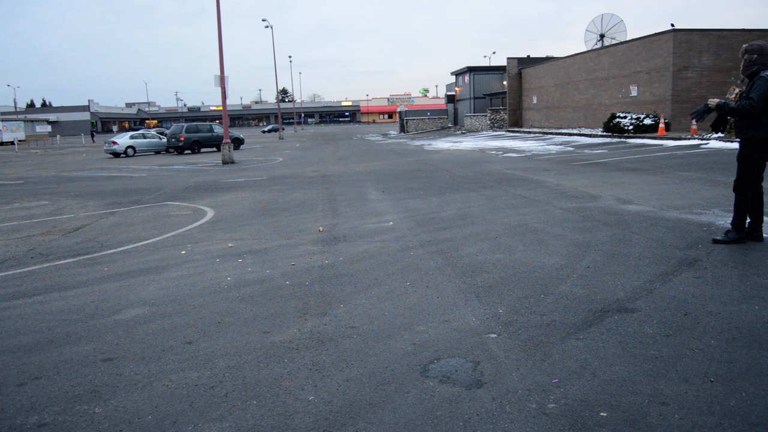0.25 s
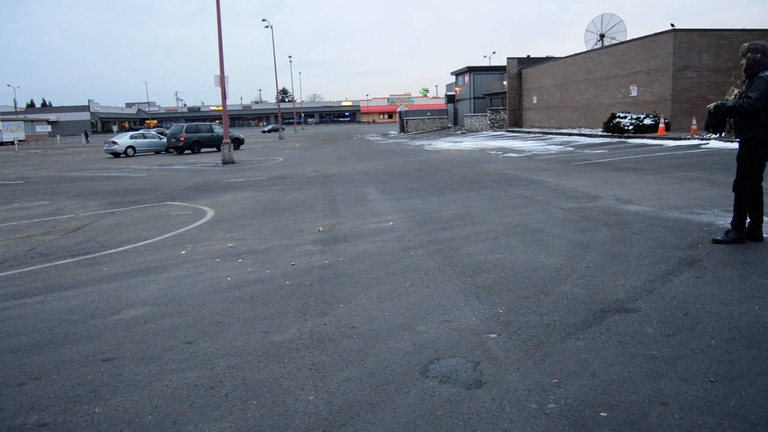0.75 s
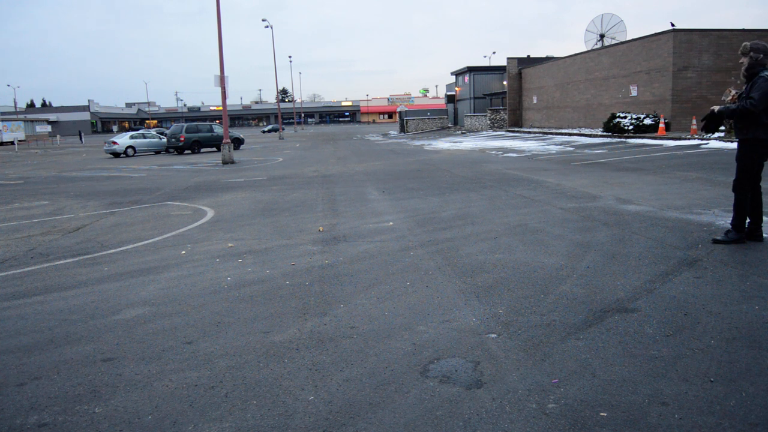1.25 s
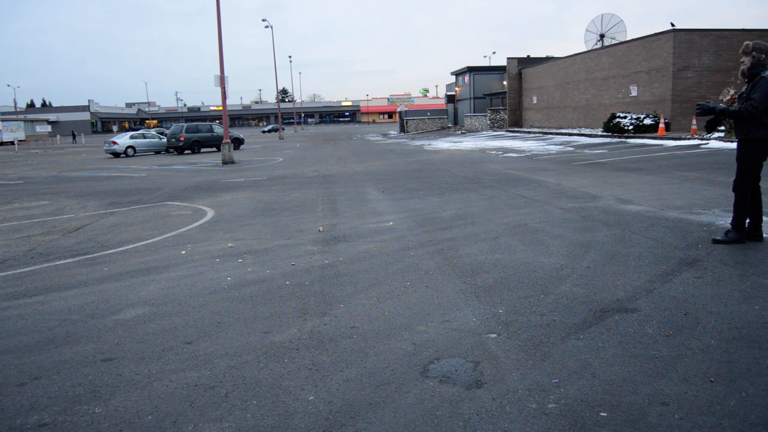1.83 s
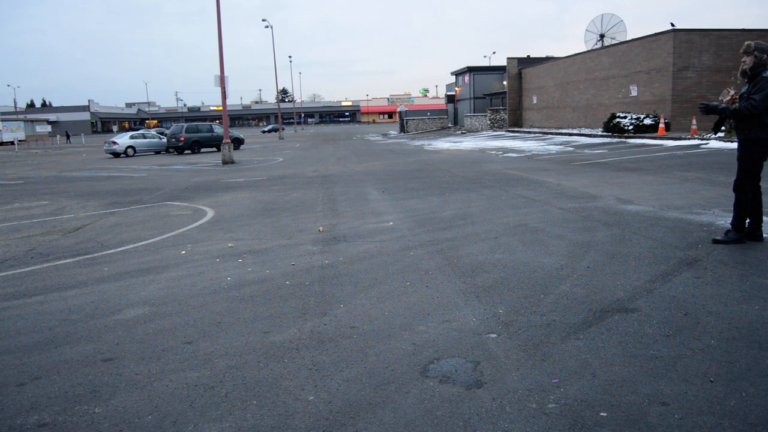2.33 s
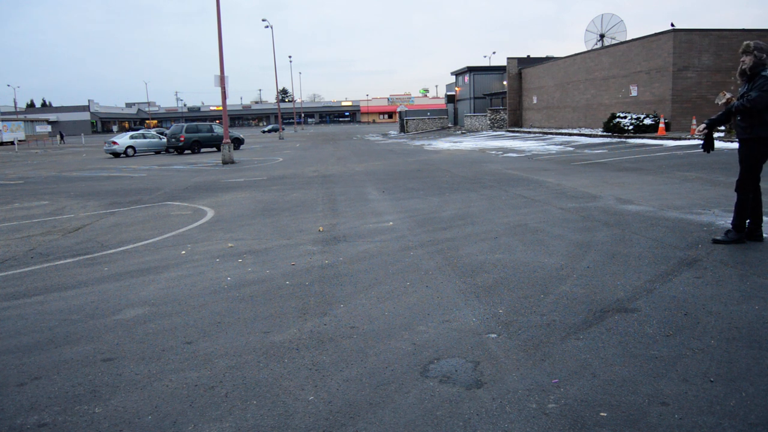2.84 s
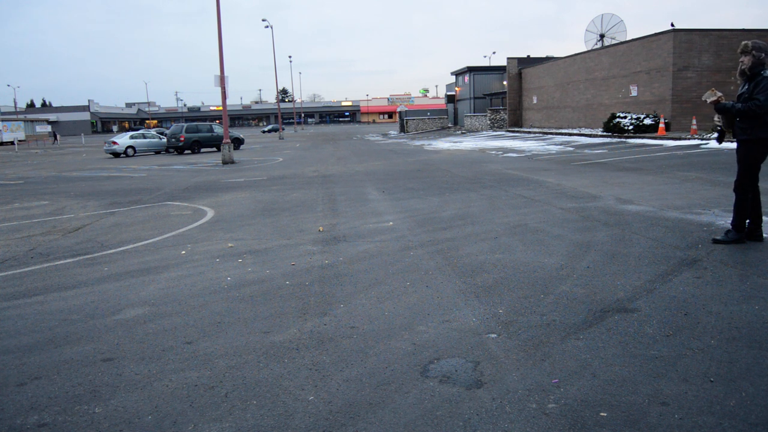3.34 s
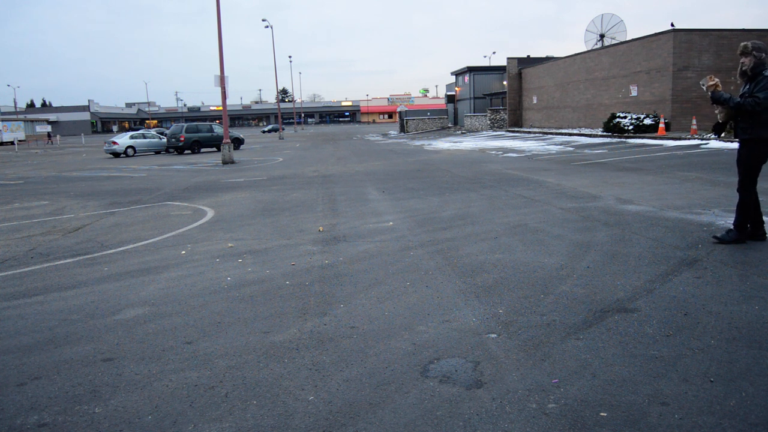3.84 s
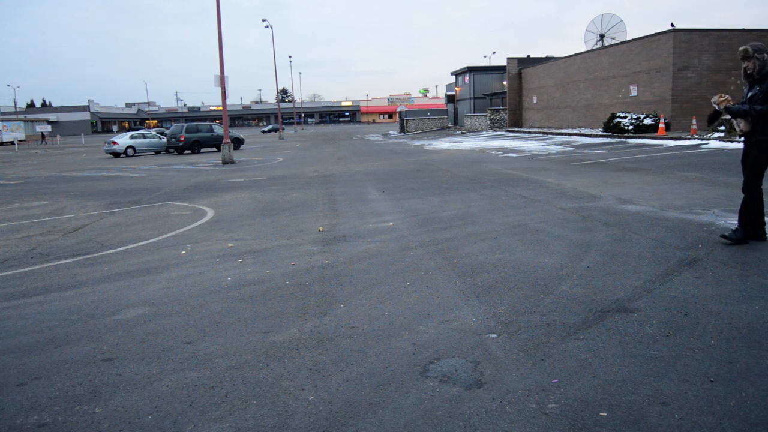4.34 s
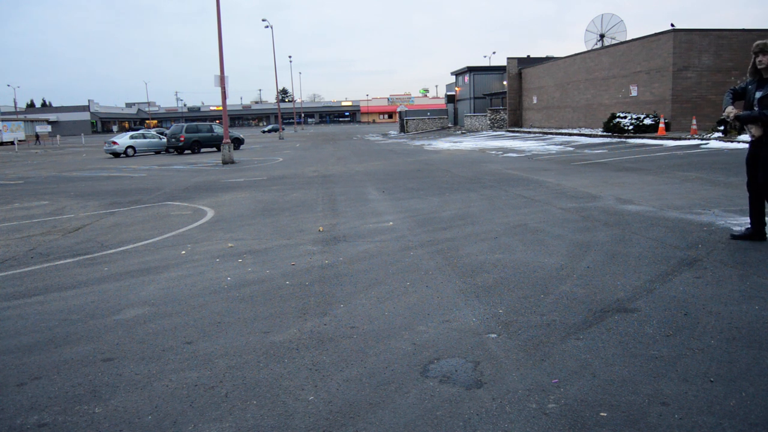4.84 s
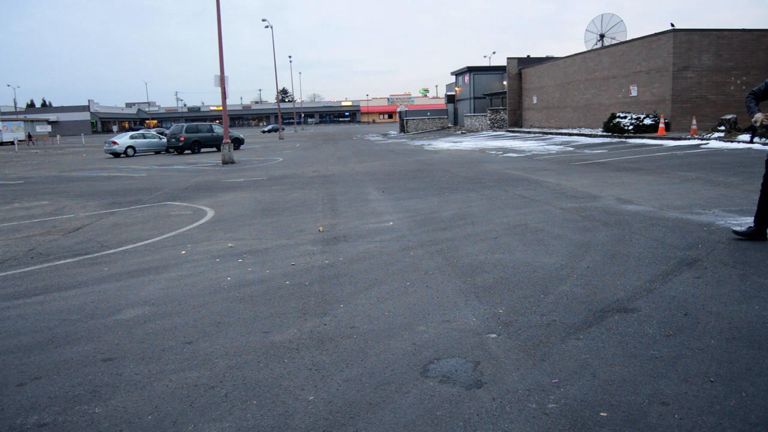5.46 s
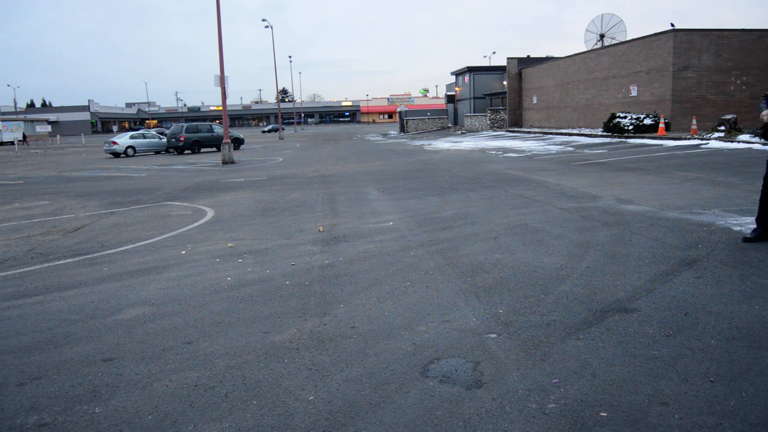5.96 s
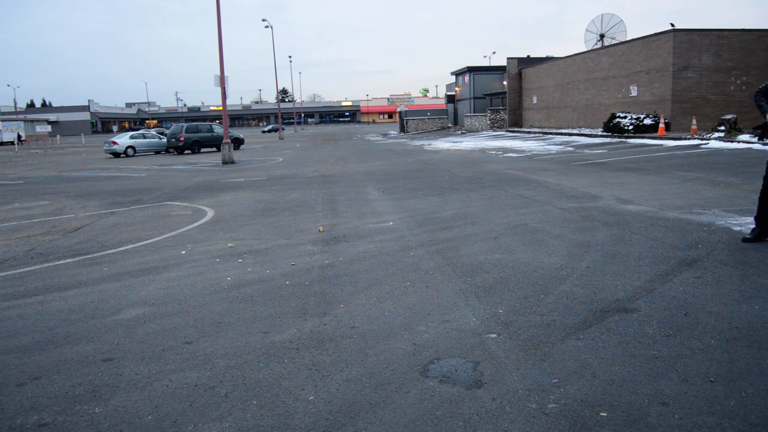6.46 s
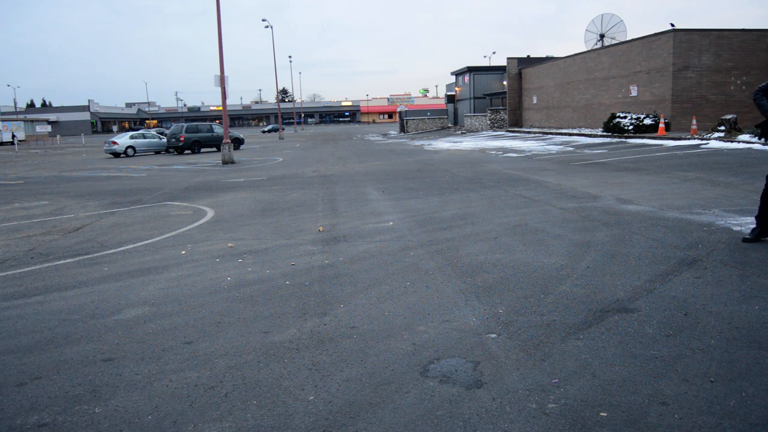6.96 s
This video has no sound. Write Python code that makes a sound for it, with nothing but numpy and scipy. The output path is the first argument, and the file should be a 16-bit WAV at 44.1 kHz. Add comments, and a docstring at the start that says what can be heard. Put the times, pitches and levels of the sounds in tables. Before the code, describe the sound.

Outdoor bird squabble over low traffic: repeated two-part gull yelps, hoarse crow caws, sharp plastic crinkling, then piercing cries and soft mews.

```python
"""A gull yelps over and over in a wide, empty car park beside a brick wall; a nearer gull cries, a third mews.
Crows caw far off, then close by, as the birds squabble over food.
Every bird is a train of unsteady syrinx pulses and breath noise, shaped by the resonances of its throat.
A plastic bag crinkles close at hand in bursts of noise clicks; filtered noise and wavering tones make
the town traffic, a passing car and an idling one."""
import sys
import numpy as np
from scipy import signal
from scipy.fft import rfft, irfft, next_fast_len
from scipy.io import wavfile
from scipy.ndimage import uniform_filter1d, map_coordinates

SR = 44100
rng = np.random.default_rng(int(sys.argv[2]) if len(sys.argv) > 2 else 0)


def inscribe(sig):
    """Save sig as 16-bit PCM at rate SR to the path in sys.argv[1].

    A 1-D sig is mono; a 2-D sig holds one channel per row.
    Samples are clipped to [-1, 1] before scaling.
    """
    pcm = np.round(np.clip(np.atleast_2d(sig).T, -1, 1) * 32767)
    wavfile.write(sys.argv[1], SR, pcm.astype(np.int16))


N = 317520
TIME = np.arange(N) / SR
TOP_HZ = 15750  # upper limit of the sound

# throat for soft low gull notes with the beak nearly shut: resonance_hz, level_db
LOW_THROAT = [(600, -11), (1000, 0), (2000, -17), (3000, -17), (5500, -45)]
# loudness of the idling car, shared by its hum and rumble: time_s, level_db
IDLE_LEVEL = [(3.7, -54), (4.1, -44), (7.2, -47.5)]


def undb(db):
    """Decibels to gain."""
    return 10 ** (np.asarray(db) / 20)


def unit(x):
    """Scale to rms 1."""
    return x / (x.std() + 1e-12)


def curve(rows):
    """A (time_s, value) table at every sample."""
    return np.interp(TIME, *np.transpose(rows))


def add(out, start, x):
    """Mix a sound in at its start time."""
    i = max(int(start * SR), 0)
    out[i:i + len(x)] += x[:max(N - i, 0)]


def wander(rate, size):
    """Smooth chance with spread near 1 and about `rate` turns a second."""
    at = np.arange(size) * rate / SR
    points = np.random.default_rng(rng.integers(2 ** 31)).standard_normal(int(at[-1]) + 2)
    return map_coordinates(points, [at], order=2, mode="nearest")


def colour(x, points):
    """Causal filter with a (hz, level_db) outline: each resonance rings after the pulse that strikes it."""
    size = 2 * next_fast_len(len(x) // 2 + 512)
    hz, db = np.transpose(points)
    bins = np.maximum(np.arange(size // 2 + 1) * SR / size, 1)
    outline_db = np.interp(np.log(bins), np.log(hz), db)
    # folding the cepstrum onto positive time gives the minimum-phase response
    cepstrum = irfft(np.log(undb(outline_db)))
    cepstrum[1:size // 2] *= 2
    cepstrum[size // 2 + 1:] = 0
    response = np.exp(rfft(cepstrum))
    return irfft(rfft(x, size) * response, size)[:len(x)]


def treble(x, hz, db):
    """Raise or lower everything above `hz`."""
    body = signal.sosfiltfilt(signal.butter(4, hz, fs=SR, output="sos"), x)
    return body + (x - body) * undb(db)


def throat_filter(x, throat, scale):
    """Throat whose resonances all slide by the factor `scale`, as its length changes."""
    # warp time, filter with a fixed throat, then warp back
    at = np.cumsum(scale)
    grid = np.arange(int(at[-1]) + 1)
    slowed = map_coordinates(x, [np.interp(grid, at, np.arange(len(x)))])
    return map_coordinates(colour(slowed, throat), [at])


def ringing(throat, ring_db):
    """Throat with its resonance near 3.3 kHz raised or lowered."""
    return [(hz, db + ring_db * np.exp(-(2 * np.log2(hz / 3300)) ** 2)) for hz, db in throat]


def note(start, length, hz, db, crest_s, attack_s, release_s, scoop=0, droop=0, bend=1,
         sag_db_per_s=0, edge_db=30, shut_db=0, open_s=0, snap_s=.0024):
    """One note as rows of time_s, pitch_hz, level_db, treble_db; it is dull until the beak opens."""
    t = np.linspace(0, length, 80)
    ramp = lambda x, span: np.clip(1 - x / max(span, 1e-4), 0, 1) ** 2
    past = np.maximum(t - crest_s, 0)
    # pitch scoops up to a crest, then droops
    fall = (past / max(past[-1], 1e-4)) ** bend
    pitch = hz * (1 - scoop * ramp(t, crest_s) - droop * fall)
    # level attacks, sags after the crest and releases
    edges = ramp(t, attack_s) + ramp(length - t, release_s)
    level = db - sag_db_per_s * past - edge_db * edges
    treble_db = -shut_db * (1 - np.tanh((t - open_s) / snap_s)) / 2
    return np.column_stack([start + t, pitch, level, treble_db])


def relaxed(rows, push_s, relax_s=.013, relax_db=8.5, relax_pitch=.046):
    """The bird pushes hard at first; as its effort eases, pitch (by a share) and level sink together."""
    s, hz, db, treble_db = rows.T
    ease = (1 + np.tanh((s - s[0] - push_s) / (2 * relax_s))) / 2
    return np.column_stack([s, hz * (1 - relax_pitch * ease), db - relax_db * ease, treble_db])


def call(rows, throat, jitter, shimmer, rasp=0, flutter=0, flutter_hz=50, subtone=0, beak=0,
         throb_db=0, waver_db=0, tire=0, spread=1, treble_hz=2370):
    """One note: syrinx pulses of unsteady pitch and strength, with air noise once a cycle, through the throat."""
    s, pitch, db, treble_db = np.transpose(rows)
    t = np.arange(s[0], max(s[-1], s[0] + .01), 1 / SR)
    size = len(t)
    progress = np.linspace(0, 1, size)
    trill = np.sin(2 * np.pi * np.cumsum(flutter_hz * (1 + .1 * wander(39, size))) / SR)
    hz = np.interp(t, s, pitch) * (1 + jitter * wander(600, size) + flutter * trill)
    phase = 2 * np.pi * np.cumsum(hz) / SR
    # the membranes part gradually, so each pulse is spread over its cycle (spread 0: they snap)
    pulses = np.zeros(size)
    for k in range(1, int(TOP_HZ / np.min(pitch)) + 1):
        # the upper overtones come and go
        strength = undb(waver_db * min(k / 3, 1) ** 2 * wander(45, size)) * (k * hz < TOP_HZ)
        pulses += np.cos(k * phase + spread * np.pi * k * k / 11) * strength
    # strong and weak pulses alternate when the membranes are driven hard
    pulses = unit(pulses) * (1 + subtone * wander(54.4, size) * np.cos(phase / 2))
    air = rasp * unit((1 + np.cos(phase)) ** 4 * wander(SR, size))
    # the opening beak shortens the throat: the resonances start low and rise
    opening = 1 - beak * np.exp(-(t - t[0]) / .025)
    voice = throat_filter(pulses + air, throat, opening)
    # even out the short-time level, so that the note's own level rules
    voice = voice / np.sqrt(uniform_filter1d(voice ** 2, SR // 80) + 1e-12)
    # the treble follows the beak and throbs with the flutter
    voice = treble(voice, treble_hz, np.interp(t, s, treble_db) + throb_db * trill)
    edges = np.clip(np.minimum(t - t[0], t[-1] - t) / .004, 0, 1)
    # a tiring voice grows shakier toward the end of the note
    shake = np.exp((shimmer + tire * progress) * wander(216.5, size))
    return voice * edges * undb(np.interp(t, s, db)) * shake


def bird(notes, throat, **voice):
    """All notes of one kind of voice."""
    out = np.zeros(N)
    for rows in notes:
        add(out, rows[0][0], call(rows, throat, **voice))
    return out


def ground(x, lag_s, share):
    """A bird is heard directly and, a moment later, off the asphalt."""
    bounce = np.interp(TIME - lag_s, TIME, x, left=0)
    return (x + share * bounce) / np.hypot(1, share)


def lot(x, wall_s=.26, wall_db=-35, tail_db=-23, t60=.81):
    """Open air: thin scatter from cars and far shop fronts, which comes back once more off the brick wall."""
    # colour of the scatter: band_hz, level_db
    lot_colour = [(200, -26), (1000, -2), (3400, -8.5), (14000, -37)]
    t = TIME[:SR]
    tail = unit(colour(rng.standard_normal(SR), lot_colour)) * undb(-60 * t / t60)
    scatter = signal.fftconvolve(x, tail / np.sqrt(np.sum(tail ** 2)))[:N]
    off_wall = np.interp(TIME - wall_s, TIME, scatter, left=0)
    return undb(tail_db) * scatter + undb(wall_db) * off_wall


def town():
    """Distant traffic as slowly changing filtered noise, a faint town hum and the hum of an idling car."""
    # traffic spectrum: band_hz, level_db (per Hz)
    traffic_colour = [(15, -37), (25, -4), (59, 1.5), (215, 0.5), (380, -4.5), (871, -2), (1240, -3),
                      (3000, -25), (10400, -34.5), (15500, -38.5)]
    # traffic loudness: time_s, level_db
    traffic_level = [(0, -35.5), (2.3, -37), (3.4, -36), (5, -40.5)]
    engine_hz, hum_hz, hum_db = 129.5, 229.8, -49.5  # centres around which the tones waver
    traffic = unit(colour(rng.standard_normal(N), traffic_colour)) * undb(curve(traffic_level))
    engine = np.sin(2 * np.pi * np.cumsum(engine_hz * (1 + .02665 * wander(7.3, N))) / SR)
    engine = engine * undb(curve(IDLE_LEVEL) + 4.3 * wander(6.7, N))
    hum = np.sin(2 * np.pi * np.cumsum(hum_hz * (1 + .0143 * wander(12, N))) / SR)
    hum = hum * undb(hum_db + 2.7 * wander(2.9, N))
    return traffic + hum + engine


def cars():
    """The tyre noise of a far car swells and fades; the idling car rumbles under its hum."""
    # tyre noise spectrum: band_hz, level_db (per Hz)
    tyre_colour = [(150, -27), (400, -3), (750, 0.5), (1100, -1), (8000, -62)]
    # idling rumble spectrum: band_hz, level_db (per Hz)
    rumble_colour = [(15, -15), (110, 0), (160, -20), (600, -53)]
    pass_s, pass_width_s, pass_db = 3.42, .49, -35
    rumble_db = 1  # against the idling level
    swell = undb(pass_db) / (1 + ((TIME - pass_s) / pass_width_s) ** 2)
    tyres = unit(colour(rng.standard_normal(N), tyre_colour)) * swell
    rumble = unit(colour(rng.standard_normal(N), rumble_colour)) * undb(curve(IDLE_LEVEL) + rumble_db)
    return tyres + rumble


def handling():
    """How hard the bag is worked: each squeeze takes hold, lasts and dies away, over a loose rustle."""
    # the bag shifting loosely in the hand: time_s, effort_db
    rustle = [(2.4, -67), (2.65, -54.5), (2.85, -41), (3.33, -59.5), (4.3, -51), (5.45, -53.5), (7.2, -53)]
    # squeezes of the bag: start_s, hold_s, effort_db, fade_db_per_s
    squeezes = [(3.381, 0.22, -42.5, 8), (4.085, 0.22, -43.5, 47), (4.601, 0.012, -41, 105),
                (4.777, 0.18, -41.5, 87), (5.062, 0.14, -42.5, 63), (5.492, 0.0089, -39.5, 250),
                (5.584, 0.14, -40, 205), (5.88, 0.19, -41.5, 222), (6.158, 0.027, -40.5, 63)]
    grip_db_per_s = 900  # how fast a squeeze takes hold
    power = undb(curve(rustle)) ** 2 * (TIME > rustle[0][0])
    for s, hold_s, db, fade_db_per_s in squeezes:
        before = np.clip(s - TIME, 0, 1)
        after = np.clip(TIME - s - hold_s, 0, 2)
        power = power + undb(db - grip_db_per_s * before - fade_db_per_s * after) ** 2
    return np.sqrt(power)


def bag(crinkle_db=8):
    """Thin plastic buckles in bursts of clicks, sparse when loose, crowded when squeezed; some creases snap."""
    # colour of the plastic film: band_hz, level_db
    film_colour = [(1500, -4), (3000, -11), (7000, -9), (10000, -2), (11800, -14.5), (15500, -26.5)]
    # creases that snap over: start_s, peak_db, tilt_db_per_octave
    snaps = [(1.488, -29, 1), (2.133, -24.5, -3.5), (2.694, -21, -4), (2.869, -13, 3), (3.254, -20.5, 6.5),
             (5.179, -14, 1)]
    bursts_per_s, burst_s, burst_spread_db = 300, .006, 3.5  # burst rate at the hardest squeeze
    clicks_per_s, hiss = 2500, .55
    work = handling()
    t = TIME[:SR // 25]
    busy = np.sqrt(work / work.max()) + 1e-3
    # rarer bursts are stronger, so the power still follows the handling
    chance = rng.random(N) < busy * bursts_per_s / SR
    burst_power = undb(burst_spread_db * np.clip(rng.standard_normal(N), -2, 2)) ** 2
    bursts = np.abs(signal.fftconvolve(chance * burst_power / busy, np.exp(-2 * t / burst_s))[:N])
    click_power = (rng.random(N) < clicks_per_s / SR) * rng.exponential(size=N)
    clicks = np.abs(signal.fftconvolve(click_power, np.exp(-t / .0004))[:N])
    energy = bursts * clicks * (work > 0)
    # a steady hiss lies under the clicks
    grain = np.sqrt(energy / energy[work > 0].mean() + hiss ** 2)
    crinkle = colour(rng.standard_normal(N) * grain, film_colour)
    out = crinkle / crinkle[work > 0].std() * work * undb(crinkle_db)
    for s, db, tilt_db in snaps:
        tilted = [(hz, band_db + tilt_db * np.log2(hz)) for hz, band_db in film_colour]
        snap = colour(rng.standard_normal(len(t)) * np.exp(-4 * t / burst_s), tilted)
        add(out, s, snap / np.abs(snap).max() * undb(db))
    return out


def far_birds():
    """A crow with a higher, hoarse and quavering caw, and a low rattling call from across the lot."""
    # far crow's throat: resonance_hz, level_db
    far_throat = [(700, -54), (1300, 2.5), (1650, 6.5), (2000, 6), (2800, -11), (3500, -6.5), (4800, -15.5),
                  (5550, -6.5), (6600, -7), (7200, -14), (9600, -18.5), (11000, -37)]
    # its caws: start_s, length_s, top_pitch_hz, level_db
    far_caws = [(0.157, 0.18, 647, -36), (.581, 0.21, 656, -34), (1.034, 0.22, 650, -36.5),
                (1.477, .218, 643, -35), (1.986, 0.22, 620, -36.5)]
    # strongest beats of the rattle: start_s, level_db
    strong_beats = [(.815, -31), (.866, -30), (.898, -29)]
    rattle_hz, beat_s = 831, .012
    shape = dict(crest_s=.06, scoop=.23, droop=.33, bend=1.2, attack_s=.046, sag_db_per_s=51,
                 release_s=.044, edge_db=7.5)
    caws = bird([note(*row, **shape) for row in far_caws], far_throat, jitter=.018, shimmer=.1, rasp=.55,
                flutter=.036, flutter_hz=47, subtone=.1, throb_db=.4, waver_db=1, spread=.15)
    half = beat_s / 2
    beats = [note(s, beat_s, rattle_hz, db, crest_s=half, attack_s=half, release_s=half)
             for s, db in strong_beats]
    drone = note(.55, .84, rattle_hz, -35, crest_s=.234, scoop=.0589, attack_s=.35, release_s=.74, edge_db=11.5)
    rattle = bird([drone] + beats, [(850, -6), (8000, -79)], jitter=.06, shimmer=.35, rasp=.36, flutter=.08)
    return ground(caws, lag_s=.000914, share=.32) + rattle


def near_crows():
    """Harsh caws: sharp, irregular pulses that flutter and throb, through a throat that slides with the beak."""
    # throats of the drawling and the curt crow: resonance_hz, level_db
    drawling_throat = [(650, -25), (1150, -3.5), (1600, 9), (1900, 3.5), (2350, 1.5), (3050, -13),
                       (3850, -6.5), (4400, -12.5), (6100, -17), (7200, -4), (10200, -23), (14000, -55)]
    curt_throat = [(650, -17), (1080, -7), (1480, 7), (1850, -1.5), (2300, 0), (2800, -12), (3550, -1),
                   (4100, -15), (4600, -6.5), (5450, -25), (6400, -8.5), (7200, -9), (9000, -20),
                   (14000, -63)]
    # caws of each: start_s, length_s, top_pitch_hz, level_db
    drawling_caws = [(2.815, 0.24, 520.3, -21), (3.457, 0.22, 510, -20), (4.067, .26, 518.6, -20.5)]
    curt_caws = [(3.548, 0.19, 579.5, -20), (3.944, 0.2, 572.6, -19), (4.383, .196, 550.7, -18.5)]
    drawling_shape = dict(crest_s=.04, scoop=.18, droop=.28, bend=1.4, attack_s=.044, sag_db_per_s=33,
                          release_s=.046, edge_db=7)
    curt_shape = dict(crest_s=.07, scoop=.26, droop=.31, bend=1.1, attack_s=.03, sag_db_per_s=41,
                      release_s=.08, edge_db=13)
    voice = dict(jitter=.028, shimmer=.12, rasp=.45, flutter=.032, flutter_hz=52, subtone=.55,
                 throb_db=.8, waver_db=1, spread=.3)
    drawling = bird([note(*row, **drawling_shape) for row in drawling_caws], drawling_throat, beak=.088, **voice)
    curt = bird([note(*row, **curt_shape) for row in curt_caws], curt_throat, beak=.14, **voice)
    return ground(drawling + curt, lag_s=.00637, share=.47)


def mewing_gull():
    """A soft low lead-in breaks into a long, level mew that swells."""
    # mewing throat: resonance_hz, level_db
    mew_throat = [(1000, -20), (1230, 2.5), (2050, -20), (2460, 8), (3650, -12), (5200, -59), (7400, -19),
                  (9000, -60)]
    # mews: break_s, length_s, pitch_hz, upward_scoop (0-1), level_db, lead_in_s, lead_in_level_db
    mew_calls = [(6.527, 0.28, 1219, 0.03, -25, .075, -27.5), (7.041, 0.22, 1266, .105, -24, 0.031, -26)]
    lead_hz = 1018
    lead_shape = dict(crest_s=.094, scoop=.066, attack_s=.057, release_s=.022, edge_db=9)
    mew_shape = dict(crest_s=.175, droop=.097, bend=6.4, attack_s=.18, release_s=.078, edge_db=10.5)
    leads = [note(s - lead_s, lead_s, lead_hz, db, **lead_shape) for s, *_, lead_s, db in mew_calls]
    mews = [note(s, length, hz, db, scoop=scoop, **mew_shape) for s, length, hz, scoop, db, *_ in mew_calls]
    lead_in = bird(leads, LOW_THROAT, jitter=.0052, shimmer=.29)
    return lead_in + bird(mews, mew_throat, jitter=.0029, shimmer=.2, rasp=.015)


def crying_gull():
    """Piercing cries: a hoarse low start breaks into a clear falling note that grows shaky and drops at the end."""
    # throats of the hoarse start and of the clear cry: resonance_hz, level_db
    onset_throat = [(690, -12), (1380, 14), (2050, -1), (2700, 2), (3450, -2.5), (4150, -3), (4700, -22),
                    (12000, -35)]
    cry_throat = [(1650, 2), (3050, -4), (3380, 3.5), (4700, -23.5), (6600, -22.5), (15000, -54)]
    # cries: break_s, length_s, hard_push_s, top_pitch_hz, level_db, upper_throat_ring_db,
    # hoarse_start_s (its length), hoarse_level_db, roughness (0-1)
    cry_calls = [(4.243, 0.18, 0.079, 1708, -21.5, -9.5, 0.075, -19.5, 0.72),
                 (4.79, 0.17, 0.078, 1714, -13, 1.5, 0.04, -14, 0.25),
                 (5.597, .195, .052, 1666, -13.5, -1, .05, -17, 0.54),
                 (6.558, 0.22, 0.082, 1683, -17, 6, 0.049, -18, 0.44)]
    hoarse_ratio = .425  # pitch of the hoarse start over that of the cry
    drop_hz, drop_s, drop_db = 1360, .032, -13  # final drop into the low register; level against the cry
    hoarse_shape = dict(crest_s=.055, scoop=.17, attack_s=.04, release_s=.014, edge_db=22)
    cry_shape = dict(crest_s=.04, scoop=.026, droop=.085, bend=2.1, attack_s=.02, sag_db_per_s=20,
                     release_s=.06, edge_db=9, shut_db=6, open_s=.016)
    drop_shape = dict(crest_s=.001, droop=.32, bend=.25, attack_s=.008, release_s=.025, edge_db=16)
    out = np.zeros(N)
    for s, length, push_s, hz, db, ring_db, hoarse_s, hoarse_db, rough in cry_calls:
        # the hoarse start overlaps the break slightly
        hoarse = note(s - hoarse_s, hoarse_s + .0075, hz * hoarse_ratio, hoarse_db, **hoarse_shape)
        clear = relaxed(note(s, length, hz, db, **cry_shape), push_s)
        drop = note(s + length, drop_s, drop_hz, db + drop_db, **drop_shape)
        out += bird([hoarse], onset_throat, jitter=.02 * rough, shimmer=.36 * rough, rasp=.2 * rough,
                    subtone=.35 * rough, flutter=.025 * rough, throb_db=2 * rough, waver_db=3, tire=.12)
        out += bird([clear], ringing(cry_throat, ring_db), jitter=.005, shimmer=.04, rasp=.03,
                    subtone=.03, waver_db=5, tire=.3)
        out += bird([drop], LOW_THROAT, jitter=.04, shimmer=.25, rasp=.2)
    return out


def yelping_gull():
    """Two-part yelps that brighten as the beak opens, then break from the low register to the high one."""
    # throats of the low rise and of the high fall: resonance_hz, level_db
    rise_throat = [(1080, 3), (2200, -0.5), (3000, 4), (3250, 10), (3480, -9), (4250, 1.5), (4550, -16),
                   (7000, -23), (12000, -66)]
    fall_throat = [(1280, 4), (2550, -3), (3550, -12), (3900, -17), (5200, -18), (6100, -17), (7200, -26),
                   (9600, -15.5), (11500, -32), (14000, -39)]
    # yelps: break_s, top_pitch_hz, rise_level_db, fall_level_db, beak_opens_s (into the rise)
    yelp_calls = [(0.392, 1302, -31.5, -28.5, 0.021), (1.04, 1299, -31, -28.5, 0.013),
                  (1.615, 1311, -30.5, -26.5, 0.019), (2.245, 1320, -31, -28.5, 0.024),
                  (2.895, 1322, -28.5, -31, 0.011), (3.445, 1304, -27.5, -26.5, 0.035),
                  (4.608, 1291, -26, -26, 0.026), (5.166, 1288, -26.5, -25, 0.024),
                  (5.689, 1257, -27, -28, .03), (6.171, 1241, -25.5, -28.5, 0.047)]
    # the yelps grow duller: time_s, treble_level_db
    dulling = [(2.3, -1.5), (6.2, -16)]
    rise_s, fall_s, overlap_s = .092, .116, .004
    low_ratio, treble_hz = .868, 3870  # pitch of the low register over the high one; where the treble begins
    rise_shape = dict(crest_s=.09, scoop=.125, attack_s=.04, release_s=.035, edge_db=9, shut_db=20)
    fall_shape = dict(crest_s=.013, scoop=.026, droop=.23, bend=1.7, attack_s=.0023, sag_db_per_s=116,
                      release_s=.017, shut_db=18, open_s=.028, snap_s=.025)
    rises = [note(s - rise_s, rise_s, hz * low_ratio, db, open_s=open_s, **rise_shape)
             for s, hz, db, _, open_s in yelp_calls]
    falls = [note(s - overlap_s, fall_s, hz, db, **fall_shape) for s, hz, _, db, _ in yelp_calls]
    rise = bird(rises, rise_throat, jitter=.004, shimmer=.1, rasp=.04, waver_db=1.5)
    fall = bird(falls, fall_throat, jitter=.004, shimmer=.08, rasp=.025, waver_db=6, tire=.3,
                treble_hz=treble_hz)
    return treble(rise + fall, treble_hz, curve(dulling))


def scene():
    """The further birds send more of their sound by way of the surroundings; bag, town and cars stay dry."""
    near = yelping_gull() + crying_gull() + mewing_gull() + near_crows()
    far = far_birds()
    echoes = lot(near + undb(4.5) * far)
    return (near + far + echoes + bag() + town() + cars())[None]


def record(dry):
    """A steep low-pass cuts the top of the treble."""
    return signal.sosfilt(signal.ellip(10, .2, 80, TOP_HZ, fs=SR, output="sos"), dry)


dry = scene()
out = record(dry)
inscribe(out)
```